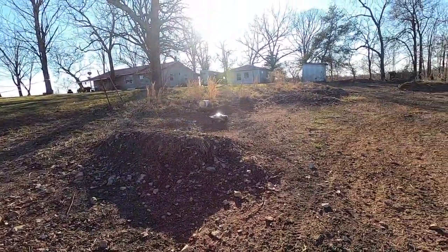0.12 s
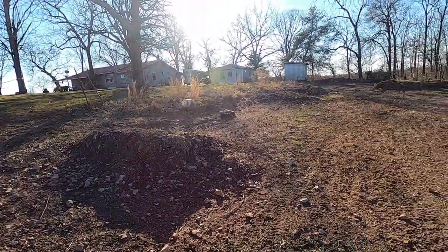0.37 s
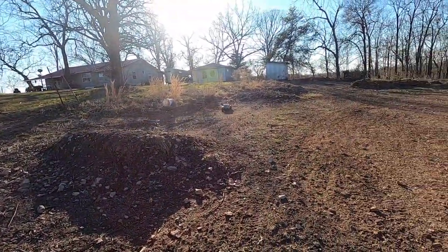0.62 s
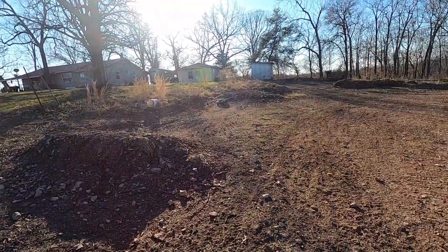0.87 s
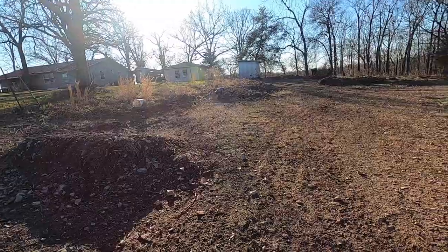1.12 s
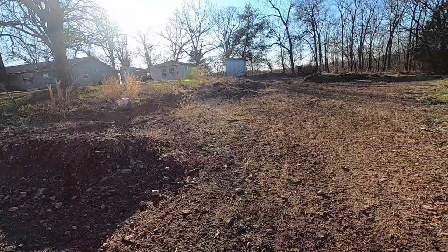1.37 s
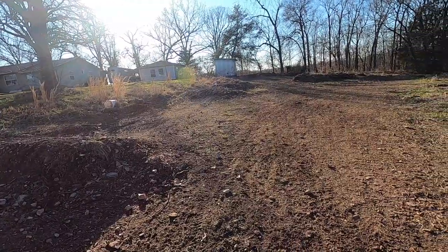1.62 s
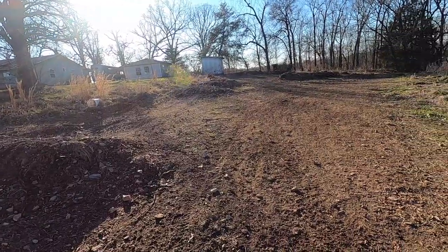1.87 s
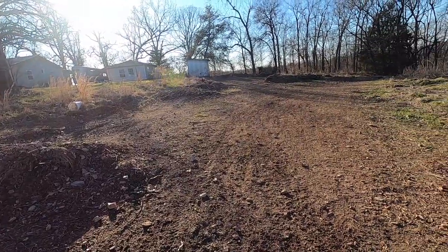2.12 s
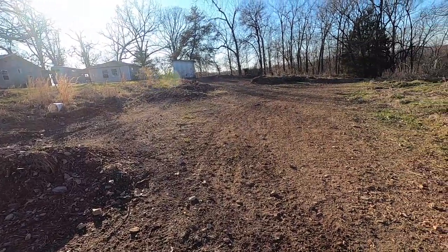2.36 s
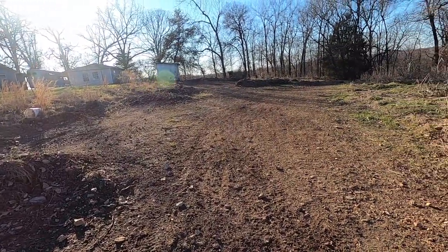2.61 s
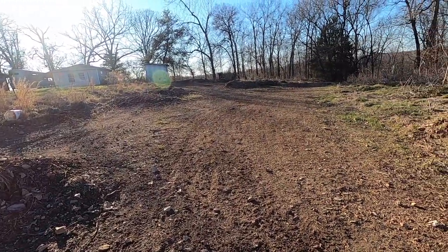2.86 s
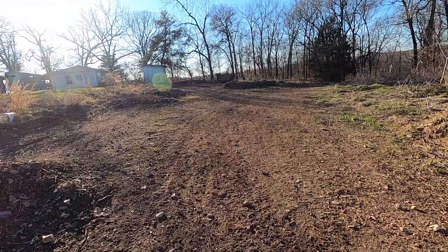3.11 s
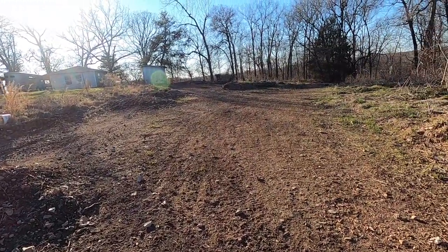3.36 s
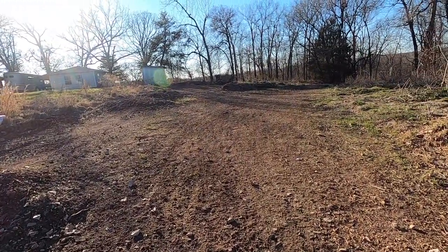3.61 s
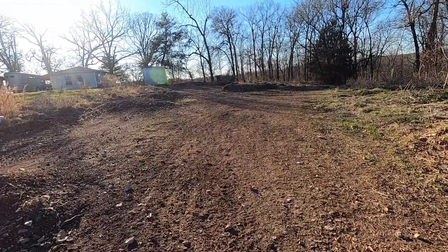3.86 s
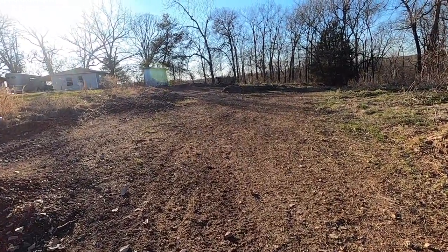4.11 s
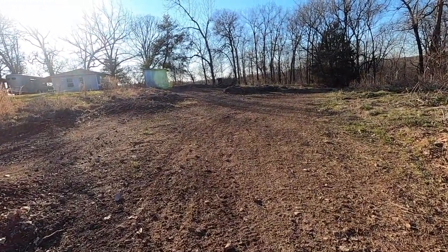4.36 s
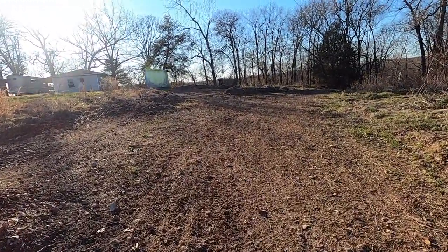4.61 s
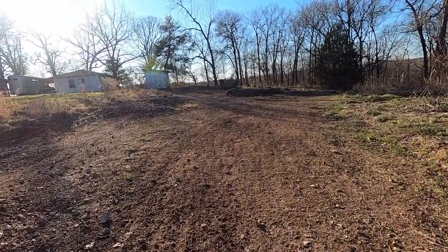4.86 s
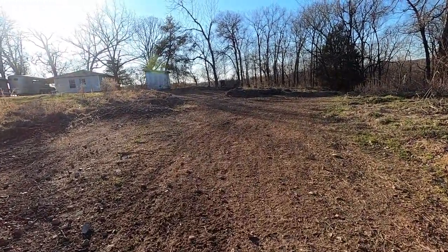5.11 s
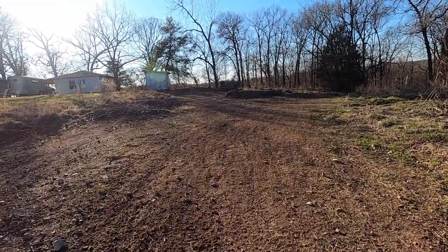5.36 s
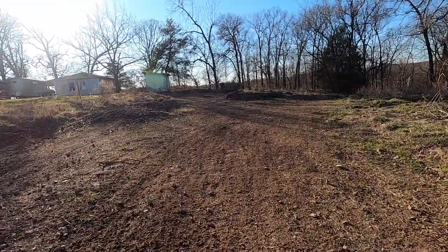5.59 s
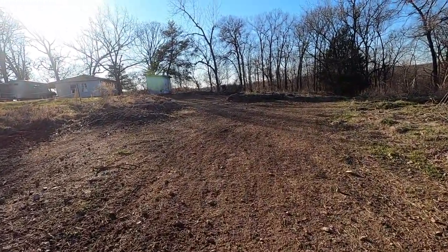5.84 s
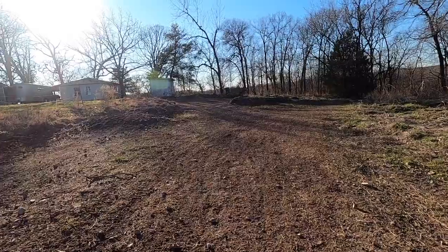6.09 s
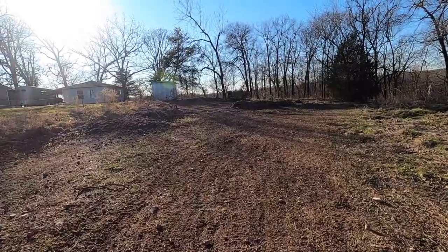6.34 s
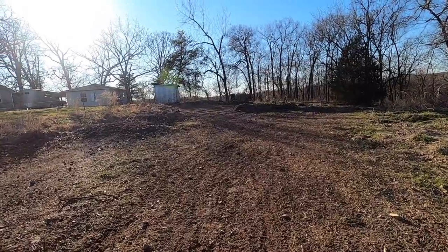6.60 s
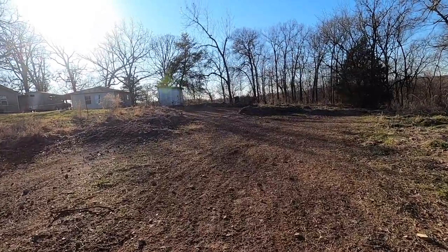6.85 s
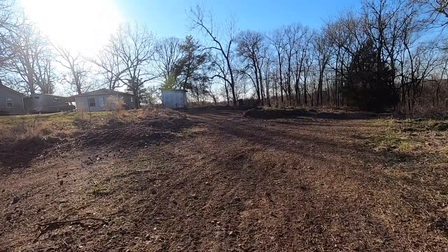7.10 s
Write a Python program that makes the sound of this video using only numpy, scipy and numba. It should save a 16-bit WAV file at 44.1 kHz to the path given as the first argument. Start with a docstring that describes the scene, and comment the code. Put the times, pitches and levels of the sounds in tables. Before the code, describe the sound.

A small electric toy truck whines and crunches away over dirt and gravel, its hollow plastic shell knocking on bumps, as wind buffets the microphone.

```python
"""A small electric toy truck drives away over dirt and gravel in an open yard: gear teeth rattle two rough
whining bands, tyres churn grit as coloured random contacts, and noise blows ring the plastic shell on bumps.
Gears squeal as gliding tones, a shaft hums as a sine, and landings thud as low noise. Gusts of low noise
buffet the microphone ports, mostly the left; noise ticks and chirping taps sound close by, over a faint hush."""
import sys
import numpy as np
from scipy import signal
from scipy.fft import rfft, irfft, next_fast_len
from scipy.io import wavfile
from scipy.ndimage import uniform_filter1d
from numba import njit

SR = 44100
rng = np.random.default_rng(int(sys.argv[2]) if len(sys.argv) > 2 else 0)


def attenuation_scalar(level_db):
    """Turn a level in dB into a linear amplitude multiplier (20 dB per decade)."""
    decades = np.asarray(level_db, float) / 20
    return 10 ** decades


def put_to_file(sound):
    """Save the sound as 16-bit audio at rate SR, in the file named by the first command-line argument."""
    columns = np.atleast_2d(sound).T  # one column per channel
    safe = np.clip(columns, -1, 1)
    whole_steps = np.round(safe * 32767)
    wavfile.write(sys.argv[1], SR, whole_steps.astype(np.int16))


N = 318394

# Resonances of the hollow plastic shell. Each row: centre in Hz, width in Hz, relative level in dB.
SHELL_MODES = [(350, 61, -2), (433, 40.7, 2.5), (510, 85, -4.5)]
# Wheels come down hard. Each row: peak time in seconds, relative shell boom in dB, relative ground thud in dB,
# time to fall 20 dB in seconds (zero or less: almost at once).
HARD_LANDINGS = [(0.1, -42, -46, 0.3), (1.127, -34, -37, 0.33), (1.551, -20, -36, -0.0165),
                 (1.6, -30.5, -39, 0.07), (1.676, -25.5, -38, 0.06), (1.798, -35, -34.5, 0.21),
                 (1.97, -45.5, -66, 0.2), (2.301, -20.5, -24, 0.09), (2.343, -21, -40, 0.0679),
                 (2.394, -29.5, -35, 0.07), (2.65, -20, -28.5, 0.0783), (2.694, -24.5, -29.5, 0.0658),
                 (2.74, -29.5, -31, 0.0842), (3.005, -42, -40.5, 0.4), (3.089, -35.5, -46, 0.27),
                 (3.23, -47, -49, 0.23), (3.361, -27, -48, 0.0058), (3.473, -39, -43, 0),
                 (3.619, -49.5, -64, 0.32), (4.892, -57.5, -62, 0.37), (6.166, -34.5, -38, 0.34),
                 (6.519, -45.5, -37, 0.2)]
LANDING_RISE_SHARE = 0.29   # rise time as a share of the fall time


def rms_one(x):
    """Scale to unit rms."""
    return x / np.sqrt(np.mean(x ** 2) + 1e-20)


def in_time(rows):
    """Table columns joined by straight lines, one value per sample."""
    s, *columns = np.transpose(rows)
    return [np.interp(np.arange(N) / SR, s, c) for c in columns]


def shape(x, spectrum):
    """Colour by a (Hz, dB) curve on a log frequency axis."""
    size = next_fast_len(N)
    hz, db = np.transpose(spectrum)
    f = np.maximum(np.arange(size // 2 + 1) * SR / size, 1)
    gain = attenuation_scalar(np.interp(np.log(f), np.log(hz), db))
    return irfft(rfft(x, size) * gain, size)[..., :N]


def band(x, low_hz, high_hz, order=2):
    """Butterworth band-pass."""
    return signal.sosfilt(signal.butter(order, [low_hz, high_hz], "band", fs=SR, output="sos"), x)


def drift(rate):
    """Random wander of unit rms, smoothed by two equal poles at rate Hz."""
    r = np.exp(-80 * np.pi * rate / SR)   # one step every 40 samples
    slow = signal.lfilter([1], [1, -2 * r, r * r], rng.standard_normal(N // 40 + 2002))[2000:]
    return np.interp(np.arange(N) / 40, np.arange(len(slow)), rms_one(slow))


@njit
def resonate(x, turn, r):
    """Resonance of gain 1 whose centre (radians a sample) may move."""
    y = np.zeros(len(x))
    for i in range(2, len(x)):
        y[i] = (1 - r * r) / 2 * (x[i] - x[i - 2]) + 2 * r * np.cos(turn[i]) * y[i - 1] - r * r * y[i - 2]
    return y


def ring(x, hz, width_hz):
    """One resonance; hz may be a number or a track."""
    return resonate(x + 1e-18, 2 * np.pi * hz / SR * np.ones(N), np.exp(-np.pi * width_hz / SR))


def body(x, modes):
    """Parallel resonances, signs alternating."""
    return sum((-1) ** k * attenuation_scalar(db) * ring(x, hz, width) for k, (hz, width, db) in enumerate(modes))


def grains(per_s, spread_db):
    """Random contacts of very uneven size; rms 1."""
    sizes = attenuation_scalar(spread_db * np.minimum(rng.exponential(1, N), 5)) * rng.choice([-1, 1], N)
    return rms_one(sizes * (rng.random(N) < per_s / SR))


def evened(x, size):
    """Noise kept going without long gaps: its own level swings are partly divided out; rms 1."""
    return rms_one(x / (uniform_filter1d(x ** 2, size=size) + 1e-20) ** 0.35)


def burst(s, t60, rise_s=0.003):
    """Noise that starts fast and dies away by 60 dB in t60 seconds."""
    age = np.arange(N) / SR - s
    rise = np.clip(age / rise_s, 0, 1)
    decay = attenuation_scalar(-60 * np.clip(age - rise_s, 0, 3 * t60) / t60)
    return rng.standard_normal(N) * rise * decay * (age < 2 * t60)


def swells(steady_db, s, db, rise_s, fall_s, hold_s=0):
    """Level in dB of a steady part plus events that climb, hold and die away, added as power."""
    t, power = np.arange(0, N + 64, 64) / SR, 0
    end_s = s + hold_s
    for k in range(len(s)):
        climb_db = 20 * np.maximum(s[k] - t, 0) / max(rise_s[k], 1e-3)
        drop_db = 20 * np.maximum(t - end_s[k], 0) / max(fall_s[k], 1e-3)
        power = power + attenuation_scalar(2 * (db[k] - climb_db - drop_db))
    return 10 * np.log10(attenuation_scalar(2 * steady_db) + np.interp(np.arange(N) / SR, t, power) + 1e-20)


def drive():
    """Gear teeth rattle two wandering bands; tyres and thrown grit fill in around them, and the shell booms."""
    # Gear whine. Each row: time in seconds, lower band in Hz, upper band in Hz,
    # relative lower share in dB, relative upper share in dB.
    whine_rows = [(0.0, 986, 2005, -2.5, -10), (0.62, 1175, 2023, -5, -8), (0.95, 1310, 1910, -13, -15),
                  (1.09, 1510, 2070, -16, -26.5), (1.14, 1140, 2550, -6.5, -32), (1.9, 1219, 2297, -11, -6),
                  (2.15, 1280, 2012, 0, -0.5), (2.73, 1230, 2250, -13, -24), (3.4, 1405, 1930, -8, -7),
                  (4.88, 1310, 1920, -4, -6.5), (5.02, 1390, 2200, -11, -8), (5.1, 1330, 1990, -12, -5.5),
                  (5.3, 1310, 2030, -2.5, -11), (5.75, 1450, 1972, -2.5, -5.5), (5.93, 1296, 1958, -1, -7),
                  (6.05, 1410, 2030, -5, 2), (6.25, 1340, 2020, -7.5, -14.5), (7.22, 1340, 1840, -1, -9)]
    # Colours of tyres and grit. Each row: frequency in Hz, relative gain in dB.
    tyre_colour = [(320, -13), (550, -8), (639, -3.5), (846, -5), (1180, -6.5), (1770, -2), (1990, -7),
                   (2430, -1.5), (4500, -26), (5850, -27.5), (9900, -120)]
    grit_colour = [(2060, -11.5), (3500, -1), (4870, -9.5), (6360, -8.5), (8850, -22), (12000, -27.5),
                   (14700, -44), (15500, -34)]
    # Steady rolling as the truck draws away. Each row: time in seconds, relative gear and tyre level in dB,
    # grit treble above that in dB.
    rolling_rows = [(0.0, -38, -5.5), (0.5, -34.5, -7.5), (1.03, -34, -9), (1.34, -50, -3),
                    (1.45, -47.5, 3), (2.11, -47, -2), (2.61, -46, -25), (2.93, -56, -7), (3.1, -43.5, -19),
                    (3.5, -49.5, -10), (4.02, -62, -14), (4.3, -64.5, -12), (4.79, -65.5, -11),
                    (5.15, -51, -11), (5.47, -54.5, -10), (5.87, -54.5, -10.5), (6.35, -49.5, -21),
                    (6.8, -63.5, -12), (7.02, -46, -20), (7.22, -58, -20)]
    # Tyres bite and spin up. Each row: peak time in seconds, relative level in dB, time to rise 20 dB in seconds,
    # time to fall 20 dB in seconds (zero or less: almost at once), grit treble above the peak in dB.
    surge_rows = [(0.102, -30, 0.14, 0.23, -14), (0.76, -31.5, 0.35, -0.7, -14),
                  (1.159, -25.5, 0.1647, 0.21, -6.5), (1.28, -31.5, 0.25, 0.2, -7),
                  (1.55, -30, -0.06, 0.14, -6), (1.606, -26, -0.08, 0.1253, -12),
                  (1.684, -32, 0, 0.18, -19), (1.818, -27, 0.1, 0.13, -13.5), (2.229, -42, 0.13, 0.32, 0),
                  (2.323, -27, 0.0346, 0.0975, -14.5), (2.36, -39.5, -0.15, 0.35, -14.5),
                  (2.632, -33, -0.06, 0.26, -13.5), (3, -38, -0.11, 0.08, -7.5),
                  (3.22, -45.5, -0.13, -0.02, -12), (3.359, -46.5, 0.35, 0.2, -15),
                  (3.618, -47, 0.3, 0.44, -11), (4.1, -59.5, 0.3, 0.2, -5.5),
                  (4.337, -56.5, 0.2, 0.65, -15), (4.893, -41.5, 0.09, 0.44, -17),
                  (5.001, -44, 0.15, 0.1, -8), (5.08, -50, 0.24, 0.3, -11.5),
                  (5.209, -46, -0.08, 0.08, -16), (5.68, -49.5, -0.86, 0.2, -10),
                  (5.799, -54, 0.22, 0.1, -1.5), (5.94, -50.5, -0.7, 16, -13),
                  (6.04, -44.5, 0.07, 1.34, -6.5), (6.164, -33.5, 0.0147, 0.24, -21),
                  (6.468, -37.5, 0, 0.11, -11.5), (6.549, -40, 0.18, 0.04, -29),
                  (7.097, -42.5, 0.07, 0.03, -17)]

    rolling_db, treble_db = in_time(rolling_rows)
    s, db, rise_s, fall_s, spray_db = np.transpose(surge_rows)
    level_db = swells(rolling_db, s, db, rise_s, fall_s)
    grit_db = swells(rolling_db + treble_db, s, db + spray_db, rise_s, fall_s)
    s, db, _, fall_s = np.transpose(HARD_LANDINGS)
    boom_db = swells(rolling_db - 13.5, s, db, LANDING_RISE_SHARE * fall_s, fall_s)
    jolt_db = 1.43 * drift(18.2)   # rough ground shakes every part together

    low_hz, high_hz, low_db, high_db = in_time(whine_rows)
    teeth = grains(3000, spread_db=3.0)
    low = rms_one(ring(ring(teeth, low_hz, 340.0), low_hz, 390.0))
    low *= attenuation_scalar(low_db + 1.9 * drift(32.23))
    high = rms_one(ring(ring(teeth, high_hz, 320.0), high_hz, 410.0))
    high *= attenuation_scalar(high_db + 2.8 * drift(26.0))

    stones = grains(4000, spread_db=2.0)
    tyres = attenuation_scalar(-4.0) * rms_one(shape(stones, tyre_colour))
    # far off, rolling loses its low end to the soft ground, hard surges less so
    ground_dip_db, far_s = -12.5, 3.7
    distance = np.minimum(np.arange(N) / SR / far_s, 1) ** 2
    surge_relief = attenuation_scalar(1.5 * (rolling_db - level_db))
    kept = attenuation_scalar(ground_dip_db * distance * surge_relief)
    tyres = tyres - (1 - kept) * shape(tyres, [(1020, -2.5), (1200, -27)])

    grit = attenuation_scalar(grit_db + 0.6 * drift(35)) * rms_one(shape(stones, grit_colour))
    shell = band(body(grains(700, spread_db=3.5), SHELL_MODES), 262.0, 920.0)
    boom = attenuation_scalar(boom_db) * evened(shell, size=1500)
    return attenuation_scalar(jolt_db) * (attenuation_scalar(level_db) * (low + high + tyres) + grit + boom)


def distant_hush():
    """Steady coloured noise, the faint background of the yard."""
    # Colour of the yard. Each row: frequency in Hz, relative gain in dB.
    yard_colour = [(120, -14), (200, 9), (272, -26), (323, -23), (496, -32), (858, -25), (1390, 3),
                   (1760, -34), (2360, -7.5), (6590, -21.5), (12000, -49), (15600, -82.5)]
    return attenuation_scalar(-64) * rms_one(shape(rng.standard_normal(N), yard_colour))


def squeals():
    """Gears sing under load: short tones glide and waver, their level flutters, a rasp surrounds them."""
    # Each row: start in seconds, length in seconds, starting pitch in Hz, final pitch in Hz (both before
    # the waver), relative level in dB.
    squeal_rows = [(0.0, 0.02, 2080, 2056, -27.5), (0.13, 0.043, 2053, 1974, -31.5),
                   (0.168, 0.06257, 2200, 2346, -35), (0.242, 0.056, 1218, 1097, -36),
                   (0.276, 0.027, 2330, 2360, -36), (0.326, 0.017, 2020, 1980, -26.5),
                   (0.365, 0.131, 2023, 2100, -34), (0.532, 0.04, 2080, 2111, -42),
                   (0.577, 0.063, 1953, 2060, -34), (0.727, 0.22, 1955, 1936, -39),
                   (0.745, 0.21, 1288, 1258, -33), (0.96, 0.16, 1339, 1509, -37),
                   (1.025, 0.07, 3050, 3400, -44), (1.111, 0.054, 1050, 1225, -27.5),
                   (1.162, 0.049, 1050, 1270, -24.5), (1.123, 0.04, 2330, 2400, -31),
                   (1.493, 0.021, 1300, 1280, -39.5), (1.59, 0.02, 1344, 1120, -28),
                   (2.172, 0.056, 2024, 2230, -37.5), (3.276, 0.051, 2055, 1940, -42.5),
                   (4.888, 0.022, 1245, 1220, -47), (4.933, 0.079, 1996, 2083, -38.5),
                   (4.958, 0.065, 2560, 2900, -46.5), (5.06, 0.012, 2000, 2030, -42),
                   (5.206, 0.01531, 2055, 2039, -44), (5.228, 0.0189, 1350, 1480, -43),
                   (5.652, 0.021, 2010, 1920, -42), (5.726, 0.088, 2004, 1888, -48.5),
                   (5.991, 0.024, 1920, 1940, -33), (6.033, 0.031, 6400, 7100, -61),
                   (6.09, 0.076, 5660, 5280, -51.5)]
    edge_s = 0.011   # fade length, centred on each end
    rasp_db, rasp_hz = -4, 260   # rough band around each tone: level and rate

    out, t = np.zeros(N), np.arange(N) / SR
    waver = 0.035 * (drift(60.1) + 0.3995 * drift(8.9))   # share of pitch
    rasp = 1 + attenuation_scalar(rasp_db) * (drift(rasp_hz) + 1j * drift(rasp_hz))
    rasp *= attenuation_scalar(2.5 * drift(52.0))   # level flutter
    for s, length, from_hz, to_hz, db in squeal_rows:
        on = np.clip(np.minimum(t - s, s + length - t) / edge_s + .5, 0, 1)
        hz = np.interp(t, [s, s + length], [from_hz, to_hz]) * (1 + waver)
        out += on * attenuation_scalar(db) * np.real(rasp * np.exp(2j * np.pi * np.cumsum(hz) / SR))
    return out


def wind():
    """Lumpy pressure at each port, partly shared, with a quicker flutter on top; gusts lean to one side."""
    # Gusts on the ports. Each row: start in seconds, length in seconds, relative level in dB,
    # left over right in dB.
    gust_rows = [(0.0, 0.012, -39.5, -3), (0.158, 0.02262, -35, -11), (0.277, 0.11, -46, -1.5),
                 (0.423, 0.21, -42, 1.5), (0.817, 0.041, -39.5, 3), (1.467, 0.36, -48, 3),
                 (2.312, 0.023, -38, 6), (2.667, 0.029, -42, -0.5), (2.96, 0.22, -45.5, 11),
                 (3.19, 0.073, -34.5, 21), (3.316, 0.088, -33.5, 15.5), (3.442, 0.022, -32.5, 15),
                 (3.516, 0.11, -34.5, 15), (3.67, 0.037, -41.5, 2), (3.703, 0.14, -45.5, 13),
                 (4.065, 0.059, -43.5, -3), (4.986, 0.13, -40.5, 10), (5.131, 0.097, -35, 6),
                 (5.32, 0.023, -32, 6), (5.37, 0.032, -33.5, 13), (5.458, 0.084, -37, 2),
                 (5.574, 0.065, -41, -2), (5.928, 0.046, -34, 10), (6.393, 0.007, -36.5, 18),
                 (6.441, 0.024, -34.5, 14.5), (6.524, 0.027, -31, 22), (6.602, 0.021, -27.5, 11),
                 (6.668, 0.049, -30.5, 7.5), (6.745, 0.013, -29, 7), (6.803, 0.013, -28, 11.5),
                 (6.88, 0.21, -41, 2.5)]
    calm_db, calm_pan_db = -53.5, 1.5   # relative level of the air between gusts, left over right

    s, hold_s, db, pan_db = np.transpose(gust_rows)
    rise_s, fall_s = 0.04 + 0 * s, 0.06 + 0 * s   # seconds per 20 dB
    db = db - 20 * np.log10(np.cosh(pan_db / 20.0))   # a one-sided gust is held back
    sides_db = np.array([swells(calm_db + side * calm_pan_db, s, db + side * pan_db, rise_s, fall_s, hold_s)
                         for side in (.5, -.5)])

    noise = rng.standard_normal((5, N))
    shared = 0.78 * noise[2]
    buffet = rms_one(band(noise[:2] + shared, 23.965, 72.7))
    buffet = buffet * attenuation_scalar([0.93 * drift(14.0), 2.3 * drift(4.4)])

    pops = [grains(80, spread_db=3), grains(80, spread_db=2)]
    flutter = rms_one(band(noise[3:] * 0.26 + pops, 89.0, 171))
    # flutter grows faster than the gust itself
    flutter_db = -11 + 0.22 * (sides_db + 32.0) + 4.7 * drift(6.0)
    return attenuation_scalar(sides_db + 1.0) * (buffet + flutter * attenuation_scalar(flutter_db))


def thuds():
    """Landings thump dully through the ground as low noise, nearly the same at both ports."""
    s, _, db, fall_s = np.transpose(HARD_LANDINGS)
    level_db = swells(-75.5, s, db, LANDING_RISE_SHARE * fall_s, fall_s)
    noise = rng.standard_normal((2, N))
    sides = noise[0] + 0.093 * noise[1] * [[1], [-1]]
    thump = evened(band(sides, 101.0, 245.0), size=900)
    return attenuation_scalar(level_db + 1.3 * drift(41.0) + np.array([[0.8], [-0.8]])) * thump


def knocks():
    """Each bump is a short noisy blow into chassis and hollow shell, with a bright crack at its front. The
    faint blow at 4.834 s is a close tick, made the same way."""
    # Each row: time in seconds, relative strength in dB, shell boom above that in dB.
    knock_rows = [(0.086, -14, 0), (0.2447, -26, -9.5), (0.325, -21, -15.5), (0.5415, -31, -11),
                  (0.759, -16, -6), (1.081, -10, 5), (1.519, -10, -4), (1.537, -3.5, -22),
                  (1.61, -3.5, -14), (1.632, -8, -5), (1.661, -9, -6), (1.946, -17.5, -6), (1.969, -16, 5),
                  (2.173, -22.5, -14), (2.2994, -4, 11.5), (2.386, -38, -1.5), (2.636, -23, -2.5),
                  (2.648, -10, -3), (2.688, -16, -4), (2.7268, -19, -12), (2.993, -18.5, 3),
                  (3.213, -19, -14), (3.599, -21.5, 7.5), (4.813, -33, -24), (4.834, -43, -23.5),
                  (5.236, -34, -4), (5.657, -28.5, -12), (6.454, -23, -7), (6.5436, -20, -6),
                  (7.048, -27, -14)]
    # Chassis resonances. Each row: centre in Hz, width in Hz, relative level in dB.
    chassis_modes = [(1120, 360, -3.5), (1660, 420, -1), (2250, 470, 1.5), (2890, 565, 0),
                     (3870, 1040, -10.5), (5400, 1400, -16)]

    sharp, dull = np.zeros(N), np.zeros(N)
    front = np.exp(-np.arange(N) / SR / 0.0019)   # extra force in the first milliseconds
    for s, db, boom_db in knock_rows:
        blow = burst(s, 0.04)
        i = int(s * SR)
        blow[i:] *= 1 + 1.1 * front[:N - i]
        sharp += attenuation_scalar(db - 5.0) * blow
        dull += attenuation_scalar(db + boom_db) * blow
    chassis = attenuation_scalar(2.0) * body(sharp, chassis_modes)
    crack = attenuation_scalar(-34.0) * band(sharp, 7600, 10300)
    boom = attenuation_scalar(-2.0) * body(dull, SHELL_MODES)
    return chassis + crack + boom


def shaft():
    """The drive shaft hums faintly as a sine of moving pitch, in short stretches."""
    # One list per stretch. Each row: time in seconds, pitch in Hz, relative level in dB.
    hum_stretches = [
        [(0.1, 218.3, -46.5), (0.256, 219, -54), (0.592, 188.7, -50.5), (0.62, 180, -50), (0.66, 176.7, -46.5)],
        [(1.09, 136.8, -39), (1.108, 136, -41.5), (1.222, 180.6, -43), (1.37, 173, -47)],
    ]
    out, t = np.zeros(N), np.arange(N) / SR
    for rows in hum_stretches:
        hz, db = in_time(rows)
        on = np.clip(np.minimum(t - rows[0][0], rows[-1][0] - t) / 0.03, 0, 1)   # 30 ms fades
        out += on * attenuation_scalar(db + 4.5) * np.sin(2 * np.pi * np.cumsum(hz) / SR)
    return out


def ticks():
    """Close ticks: a noise snap with a short ring, each from its own side."""
    # Each row: time in seconds, relative strength in dB, ring in Hz, relative snap in dB, left over right in dB.
    tick_rows = [(0.148, -29, 8000, 0, -8.5), (3.861, -45, 1920, 2, 3), (3.942, -46, 2120, -4, 12.5),
                 (4.008, -49, 1900, -4, 15), (4.199, -50.5, 2300, 2, 11.5), (4.331, -32, 1310, -1, 6),
                 (4.335, -41, 5440, 8, -3), (4.346, -31, 1500, -2, 6), (4.351, -28.5, 1100, -7, 5),
                 (4.365, -46, 6460, 9, 7), (4.371, -49, 6240, 4, 3), (4.401, -35.5, 1340, -2, 5),
                 (4.414, -35.5, 6200, 7.5, 4.5), (5.12, -46, 1287, 8.5, 27), (5.326, -36.5, 2300, 5.5, 9.5),
                 (5.355, -46, 2407, 12.5, 11), (6.4585, -43, 6900, 3, 2), (6.4762, -43, 5460, -1, 2),
                 (6.622, -42.5, 6700, 12, 6), (6.7072, -44, 3500, 11, 7), (6.715, -43, 6440, -6, 8)]
    out = np.zeros((2, N))
    for s, db, hz, snap_db, pan_db in tick_rows:
        blow = burst(s, t60=0.013, rise_s=0.0015)
        tick = attenuation_scalar(9.5) * ring(blow, hz, 0.18 * hz) + attenuation_scalar(snap_db) * band(blow, 1060, 4000)
        out += attenuation_scalar(db + np.array([[pan_db / 2], [-pan_db / 2]])) * tick
    return signal.sosfilt(signal.butter(4, 8600, fs=SR, output="sos"), out)   # dulled above 8.6 kHz


def taps():
    """A tap runs along the thin support as a falling chirp, treble first; it cracks and leaves a faint ring."""
    # Taps on the microphone's support. Each row: time in seconds, relative strength in dB, relative crack in dB,
    # left over right in dB.
    tap_rows = [(4.053, -26, 0.5, 11), (5.436, -43, 2, 7.5), (5.496, -43.5, 13.5, 15),
                (5.568, -33, -18.5, 10), (6.735, -32, 0.5, 8.5)]
    # Colour of the chirp. Each row: frequency in Hz, relative gain in dB.
    chirp_colour = [(25, 12), (45, 7.5), (280, -10.5), (600, 2.5), (1100, -4.5), (2000, -16.5), (9000, -64)]
    # Resonances of the support. Each row: centre in Hz, width in Hz, relative level in dB.
    support_modes = [(177, 23, -2), (538, 18, -10), (678, 20, -11), (910, 16, -6)]
    spread = 0.159   # bending waves: a part at f Hz takes spread / sqrt(f) seconds
    crack_t60_s = 0.035

    hz = np.arange(4097) * SR / 8192
    early_s = spread / np.sqrt(4000)   # the part at 4 kHz lands on the tap's own time
    turns = 2 * spread * np.sqrt(hz) - early_s * hz
    colour_hz, colour_db = np.transpose(chirp_colour)
    colour = attenuation_scalar(np.interp(np.log(hz + 1), np.log(colour_hz), colour_db))
    chirp = irfft(colour * np.exp(-2j * np.pi * turns))[:6000]
    chirp = chirp / np.abs(chirp).max()

    out = np.zeros((2, N))
    for s, db, crack_db, pan_db in tap_rows:
        paths = attenuation_scalar(-24.5) * burst(s, crack_t60_s)   # joints scatter the wave
        paths[int(s * SR)] = 1
        crack = attenuation_scalar(crack_db) * band(burst(s, crack_t60_s, 0.0015), 1430, 3550)
        tap = crack + signal.fftconvolve(paths, chirp)[:N]
        out += attenuation_scalar(db + np.array([[pan_db / 2], [-pan_db / 2]])) * tap
    return out + attenuation_scalar(8.5) * np.array([body(side, support_modes) for side in out])


def two_ports(x):
    """Sound reaches the right port first, brighter on top; ground scatter differs per side and keeps shifting."""
    left_lag_s = 2.8e-5
    left = np.interp(np.arange(N) - left_lag_s * SR, np.arange(N), x)
    right = shape(x, [(300, -1.5), (1000, -0.7), (3000, -3.0), (8000, 1), (14000, 10.5)])
    echoes = rng.standard_normal((4, 1500)) * attenuation_scalar(-60 * np.arange(1500) / SR / 0.043)   # 60 dB in 43 ms
    echoes /= np.sqrt(np.sum(echoes ** 2, axis=1, keepdims=True))
    paths = signal.fftconvolve(x[None], echoes, axes=1)[:, :N]
    turn = np.array([2.86 * drift(6.65), 2.84 * drift(6.45)])   # radians, blends two echo patterns a side
    scatter = np.cos(turn) * paths[:2] + np.sin(turn) * paths[2:]
    return np.array([left, right]) + shape(scatter, [(300, -13), (1500, -12), (4000, -6), (8000, 0)])


def scene():
    """Truck and distant hush through the two ports; thuds, taps, ticks and wind right at them."""
    around = drive() + squeals() + shaft() + knocks() + distant_hush()
    return two_ports(around) + thuds() + taps() + ticks() + wind()


def roll_off(x):
    """The treble ends steeply here."""
    return signal.sosfilt(signal.butter(12, 15710, fs=SR, output="sos"), x)


def record(dry):
    """A steep low-pass holds everything above 16.3 kHz at least 60 dB down."""
    mix = signal.sosfilt(signal.cheby2(10, 60, 16300, fs=SR, output="sos"), dry)
    return roll_off(mix)


dry = scene()
out = record(dry)
put_to_file(out)
```